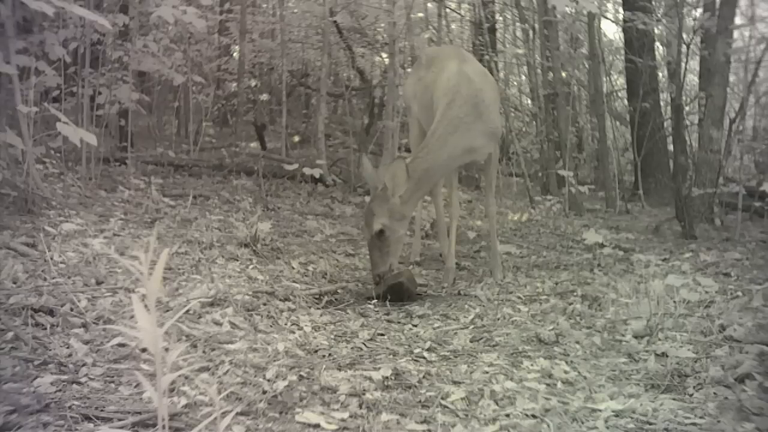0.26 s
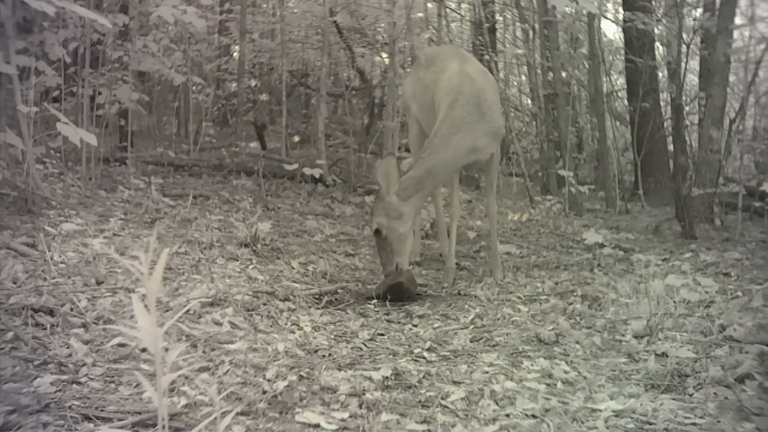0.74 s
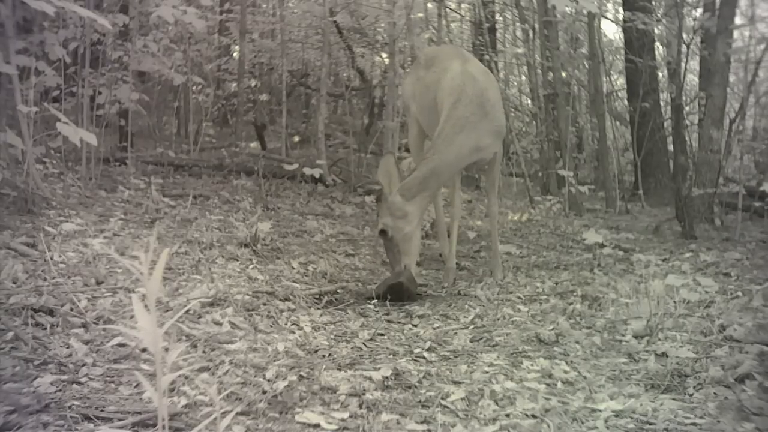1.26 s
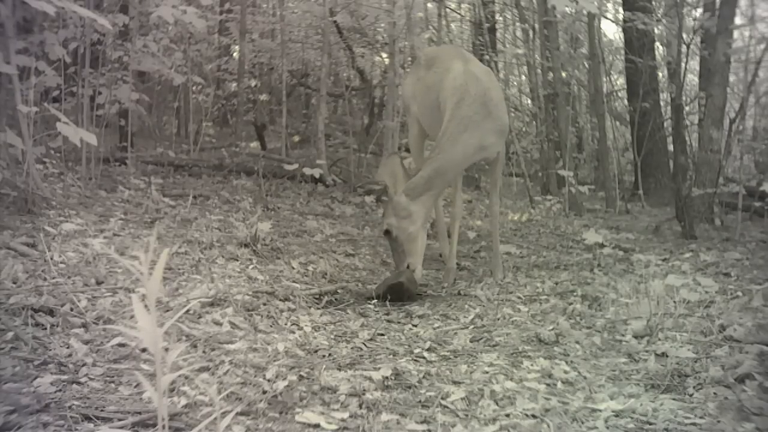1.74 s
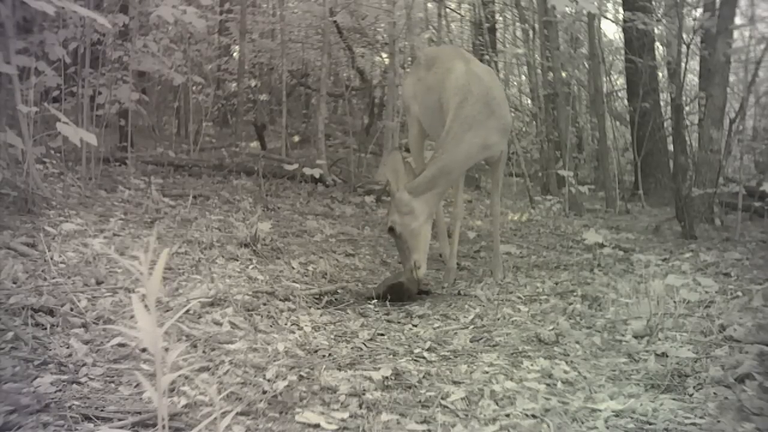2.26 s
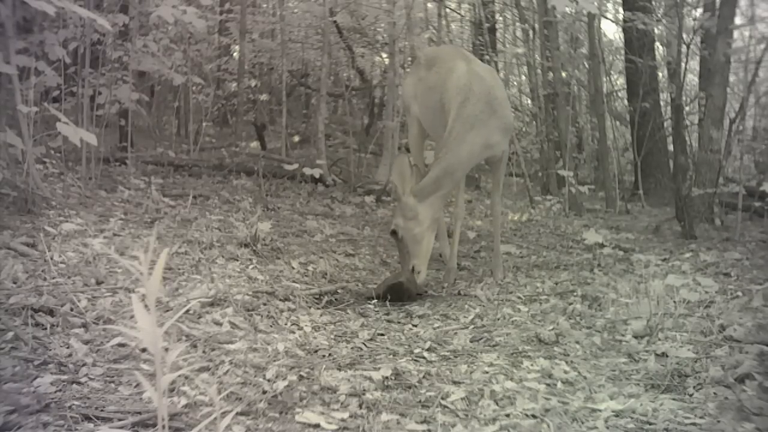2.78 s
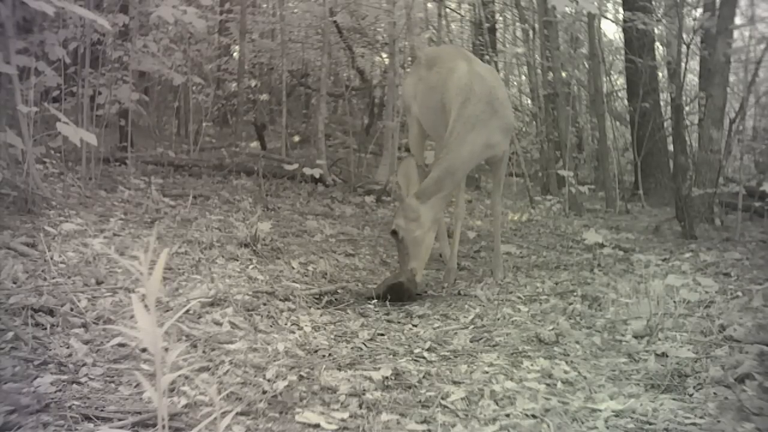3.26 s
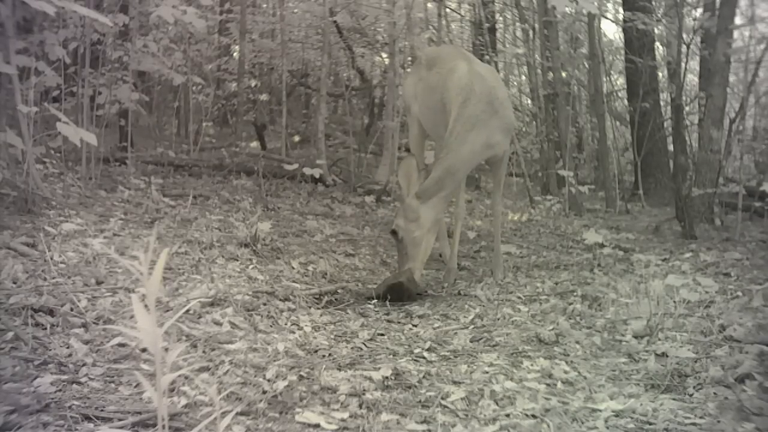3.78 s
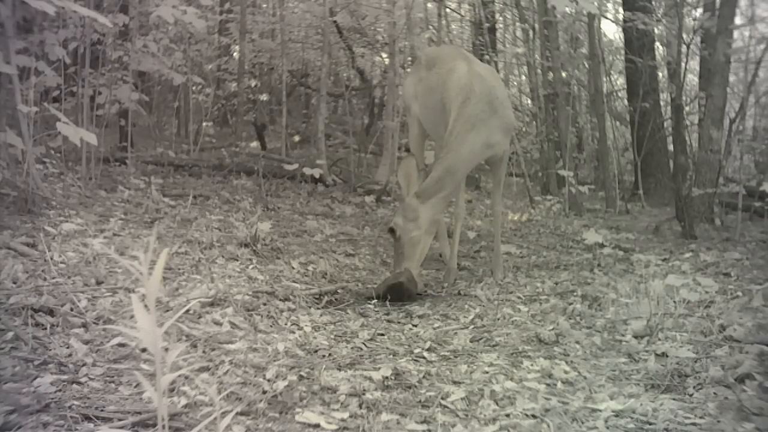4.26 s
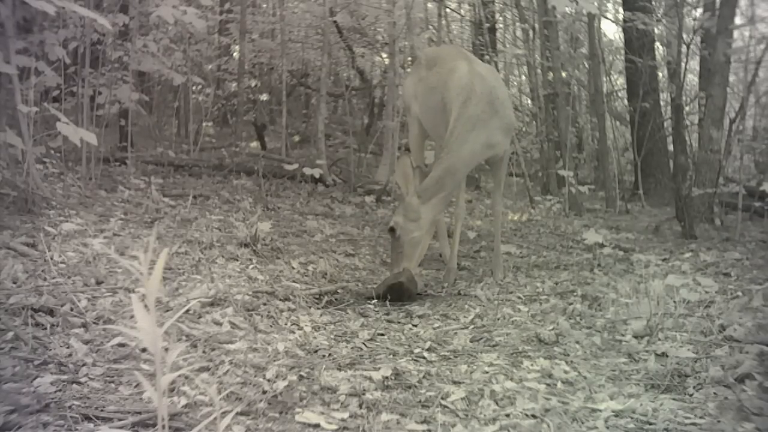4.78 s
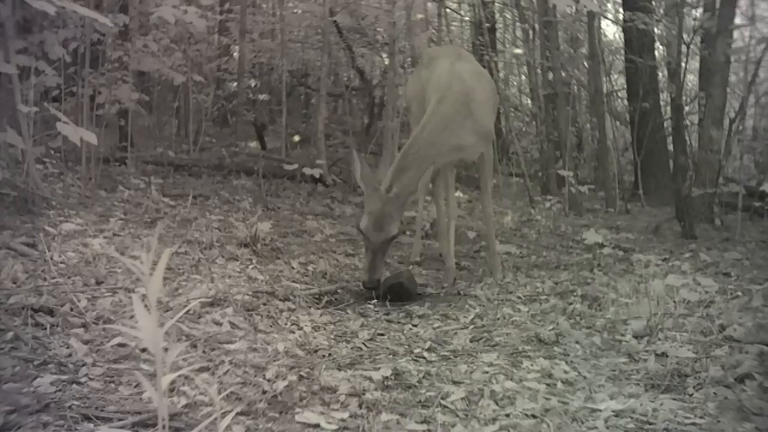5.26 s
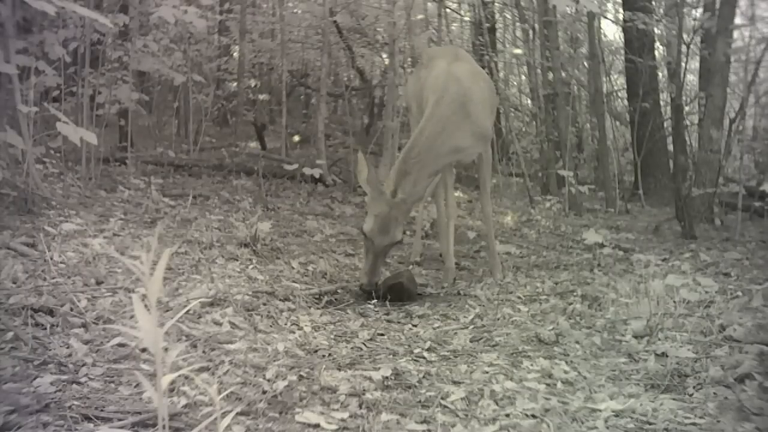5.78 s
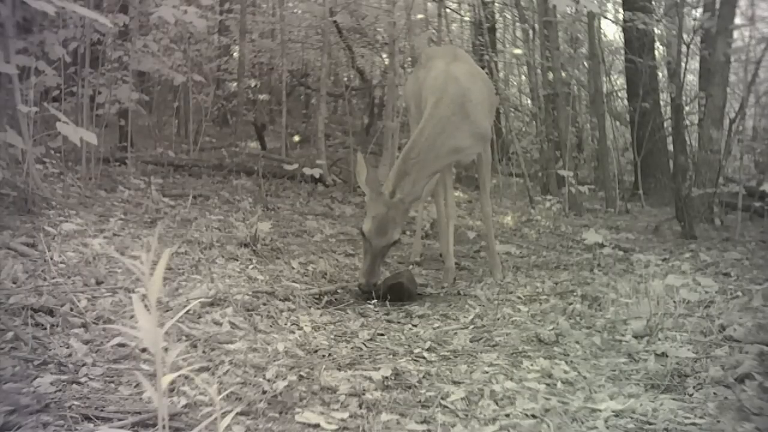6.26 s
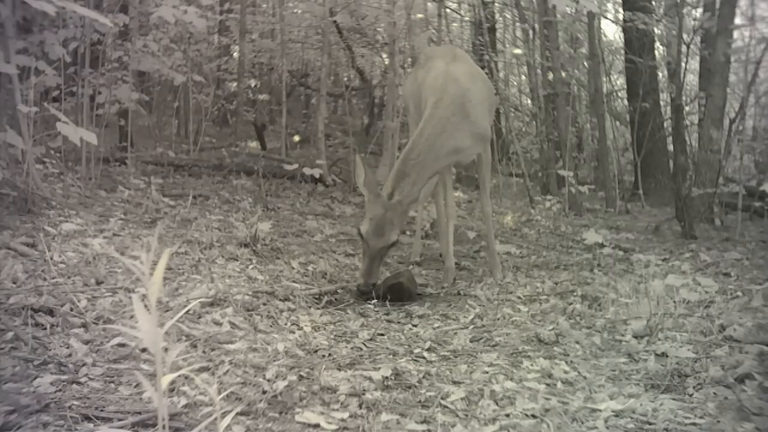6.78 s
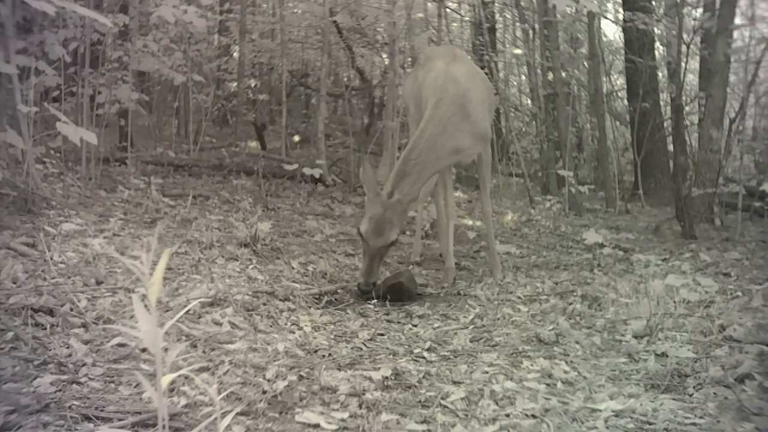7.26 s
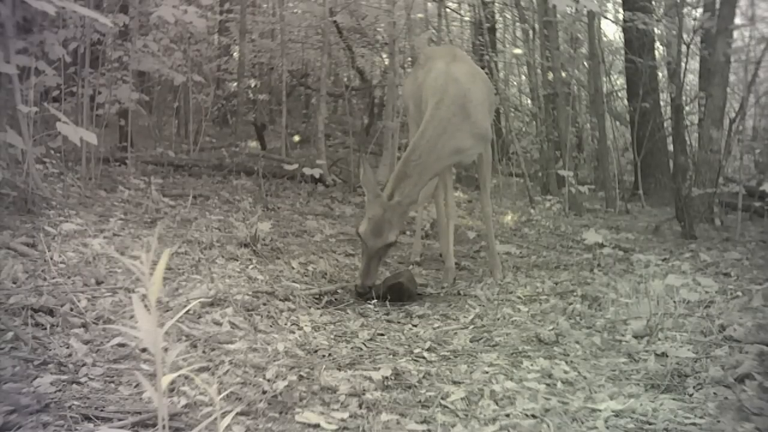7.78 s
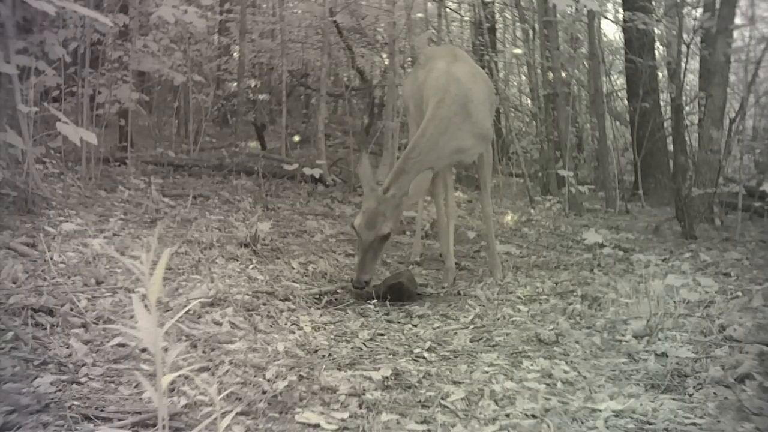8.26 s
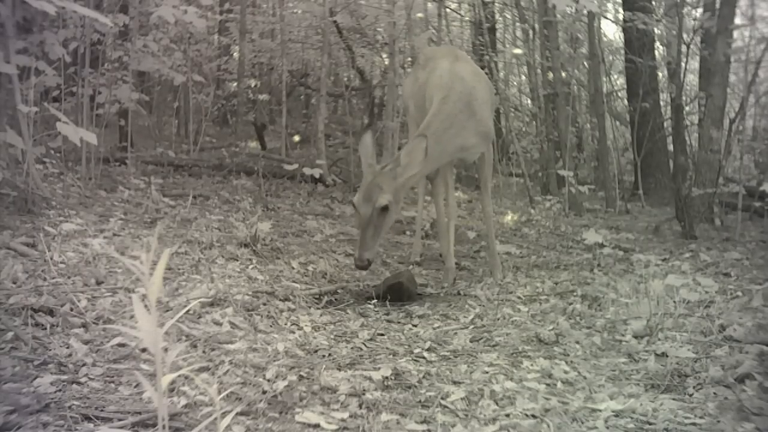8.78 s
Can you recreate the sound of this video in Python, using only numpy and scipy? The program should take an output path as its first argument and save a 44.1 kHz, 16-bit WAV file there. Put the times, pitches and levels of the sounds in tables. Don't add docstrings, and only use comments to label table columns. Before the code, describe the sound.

Hoarse, fluttering rising whistles repeat every couple of seconds among trees, with leaf ticks, faint insects, recorder hiss, a thump and a brief dropout.

```python
import sys
import numpy as np
from scipy import signal
from scipy.fft import rfft, irfft, next_fast_len
from scipy.io import wavfile

SR = 44100
rng = np.random.default_rng(int(sys.argv[2]) if len(sys.argv) > 2 else 0)


def boost(x):
    u = np.asarray(x, float) / 20
    return 10 ** u


def master(y):
    cut = np.clip(np.atleast_2d(y).T, -1, 1)
    pcm = np.round(cut * 32767)
    wavfile.write(sys.argv[1], SR, pcm.astype(np.int16))


N = 397782


def seconds():
    return np.arange(N) / SR


def rms_one(x):
    return x / np.sqrt(np.mean(x ** 2) + 1e-20)


def drift(rate_hz, size=N):
    r, run_in = np.exp(-2 * np.pi * rate_hz / SR), int(SR / rate_hz)
    noise = rng.standard_normal(size + run_in)
    return rms_one(signal.lfilter([1], [1, -2 * r, r * r], noise)[run_in:])


def resonate(x, hz, width_hz):
    r = np.exp(-np.pi * width_hz / SR)
    top_gain = (1 - r * r) / 2
    return signal.lfilter([top_gain, 0, -top_gain], [1, -2 * r * np.cos(2 * np.pi * hz / SR), r * r], x)


def coloured(spectrum):
    size = next_fast_len(N)
    points_hz, level_db = np.transpose(spectrum)
    log_hz = np.log(np.fft.rfftfreq(size, 1 / SR) + 1)
    colour = boost(np.interp(log_hz, np.log(points_hz), level_db))
    return rms_one(irfft(rfft(rng.standard_normal(size)) * colour, size)[:N])


# (start [s], depth [dB], recovery [s])
DUCKS = [
    (0.877, -8, 0.108),
    (2.75, -4, 0.049),
    (4.21, -8, 0.0643),
    (6.02, -9, 0.0425),
    (8.079, -12.5, 0.0703),
]


def gain_db():
    t = np.arange(0, N / SR + 1, 1e-3)
    dips = np.zeros(len(t))
    for s, depth_db, recovery_s in DUCKS:
        attack = np.clip((t - s) / 0.0155, 0, 1)
        dips += depth_db * attack * np.exp(-(np.maximum(t - s, 0) / recovery_s) ** 2)
    return np.interp(seconds(), t, dips)


# (frequency [Hz], level per Hz [dB])
HISS = [(24, -34), (40, -3.5), (46, -15.5), (54, -9), (108, -9), (357, -17.5), (405, -18), (3270, -30.5),
        (4300, -30), (4870, -34), (6090, -36.5), (8210, -34.5), (8850, -38.5), (13900, -43), (15300, -45)]


def background():
    hiss = boost(-37 + 0.455 * drift(4)) * coloured(HISS)
    housing_hz, housing_width_hz = 4900, 1085
    leaves = rng.standard_normal(N)
    for _ in range(2):
        leaves = resonate(leaves, housing_hz, housing_width_hz)
    stir_db = 2.0 * drift(3) + 1.1 * drift(25)
    return hiss + boost(-50 + stir_db) * rms_one(leaves)


# (multiple of frame rate [1], peak level [dB])
HUM = [(1, -33), (2, -48), (3, -52), (4, -50)]


def supply():
    t = seconds()
    frame_hz, hum_dip_s = 29.987, 0.01302
    hum = -sum(boost(level_db) * np.cos(2 * np.pi * k * frame_hz * (t - hum_dip_s)) for k, level_db in HUM)
    since = (t - np.where(t < 5, .1, .42)) % .5
    sag = -boost(-33) * np.sin(2 * np.pi * 9.0 * since) * np.exp(-since / 0.093)
    pause_start_s, pause_end_s = 4.92, 5.37
    running = np.clip(np.maximum(pause_start_s - t, t - pause_end_s) / 0.024, 0, 1)
    whine = boost(-70.5) * np.sin(2 * np.pi * 11960 * t)
    after = np.maximum(t - 3.9658, 0)
    leak = (33 * np.exp(-33 * after) - 1.5 * np.exp(-1.5 * after)) / 31.5
    thump = -boost(.2) * (1 - np.exp(-after / .0032)) * leak
    return running * (hum * boost(0.77 * gain_db()) + sag) + whine + thump


# (start [s], end [s], pitch [Hz], rms level [dB])
INSECTS = [(0, 2.55, 8460, -68), (3.31, 7.1, 8450, -66.5), (7.852, 9.1, 8450, -65.5), (0, .6, 8110, -69),
           (2.35, 2.8, 8130, -68), (3.28, 3.92, 8120, -68), (0, 2.75, 8320, -72), (3.1, 7.1, 8320, -72),
           (5.3, 9.1, 7900, -71), (0, .35, 7650, -70), (5.7, 7.2, 7450, -73)]


def insects():
    out = np.zeros(N)
    chirps_per_s, chirp_s = 25.0, .0042
    for start, end, hz, level_db in INSECTS:
        song = slice(int(start * SR), int(end * SR))
        t = seconds()[song]
        on = np.clip(np.minimum(t - start, end - t) / .04, 0, 1)
        beat = ((t - start) * chirps_per_s + .5) % 1 - .5
        chirps = .15 + np.exp(-.5 * (beat / chirps_per_s / chirp_s) ** 2)
        tone = np.sin(2 * np.pi * hz * t + 1.5 * drift(9, size=len(t)))
        out[song] += boost(level_db + 4.5) * on * rms_one(chirps * tone)
    return out


# (time [s], peak level [dB], pitch [Hz])
TICKS = [
    (1.4885, -27, 4790),
    (1.8841, -27.5, 4900),
    (2.4238, -21, 4990),
    (3.9922, -20, 4785),
    (4.5394, -33, 4600),
    (4.9003, -40, 4880),
    (7.1094, -31, 4920),
    (8.0037, -28, 4920),
]
# (start [s], level [dB], length [s], lowest [Hz], highest [Hz])
RUSTLES = [
    (2.575, -36.5, 0.114, 4150, 5140),
    (2.565, -39, 0.071, 3550, 3950),
    (7.865, -45, 0.028, 3500, 4060),
    (4.445, -40.5, 0.044, 3680, 5940),
    (7.995, -42, 0.029, 4200, 5250),
    (7.98, -34.5, 0.0277, 2484, 2700),
    (4.893, -48.5, .014, 4410, 4970),
    (5.2, -51, 0.058, 8200, 8500),
]


def litter():
    out, t = np.zeros(N), np.arange(SR // 10) / SR
    tick_t60_s = .0072
    for s, peak_db, hz in TICKS:
        ring = np.sin(2 * np.pi * hz * t) + 0.37 * np.sin(2 * np.pi * 1.121 * hz * t)
        decay = boost(peak_db + 5.0 - 60 * t / tick_t60_s)
        out[int(s * SR):][:len(t)] += decay * ring * np.clip(t / 0.00056, 0, 1)
    for s, level_db, length_s, low_hz, high_hz in RUSTLES:
        t = np.arange(int(4 * length_s * SR)) / SR
        band = signal.butter(2, [low_hz, high_hz], "band", fs=SR, output="sos")
        swell = np.clip(t / 0.011, 0, 1) * np.exp(-(t / length_s) ** 2)
        noise = rms_one(signal.sosfilt(band, rng.standard_normal(len(t))))
        out[int(s * SR):][:len(t)] += boost(level_db) * swell * noise
    return out


# (decay by 60 dB [s], level [dB])
ECHOES = [
    (.2, -2),
    (.55, -7.5),
]


def trunks(x):
    t = np.arange(SR) / SR
    dying = sum(boost(2 * (db - 60 * t / t60)) / t60 for t60, db in ECHOES)
    power = dying * 6 * np.log(10) / SR
    cloud = rng.standard_normal(SR) * np.sqrt(power) * np.clip(t / 0.0035, 0, 1)
    return signal.fftconvolve(x, cloud)[:N]


def raspy(turn, width_hz, rasp):
    rasp, size = np.clip(rasp, 0, 1), len(turn)
    slow, fast = ((drift(hz, size=size) + 1j * drift(hz, size=size)) / np.sqrt(2)
                  for hz in (width_hz, 2.1 * width_hz))
    fast_share = .35 * rasp ** 3
    wander = np.sqrt(1 - fast_share) * slow + np.sqrt(fast_share) * fast
    return np.real((np.sqrt(1 - rasp) + np.sqrt(rasp) * wander) * np.exp(1j * turn))


# (start [s], lowest [Hz], top [Hz], slide [s], bend [1 straight, 2 rounded])
SLIDES = [
    (.77, 2362, 4341, 0.1925, 2.03),
    (2.6, 2892, 4625, .14, 1.3),
    (4.05, 2388, 4515, .21, 2.6),
    (5.83, 1848, 4562, .2, 1.4),
    (7.95, 2048, 4390, .27, 3.2),
]
# (peak level [dB], swell [s], hold [s], fade [s], fade level [dB])
EFFORTS = [(-23, 0.0807, 0.1456, 0.101, -15.5), (-27.5, 0.071, 0.1104, 0.0815, -16),
           (-24.5, 0.078, 0.1109, .085, -12.5), (-22.5, 0.1022, 0.1755, 0.0903, -14),
           (-22, 0.0877, 0.118, 0.119, -9)]
# (upper in slide [dB], upper on top [dB], lower in slide [dB], lower on top [dB])
BURRS = [(-5.5, -5, -15, -16.5), (-9, -5, -1.5, -12), (-10, 0.5, -8.5, -21.5), (-4.5, -15, -16, -10.5),
         (-7.5, -14, -15.5, -16)]
# (flutter [Hz], line width [Hz], rasp share [0-1], second upper line [dB], echo [dB])
VOICES = [(390.9, 72, 0.83, -17, 1.5), (300, 110, 0.71, -15, 5), (499.2, 70, 0.85, -33, 3.5),
          (371.5, 100, 0.74, -27, -0.5), (370, 60, 0.55, -26, 0)]


def calls():
    out = np.zeros((2, N))
    for slide, effort, burr, voice in zip(SLIDES, EFFORTS, BURRS, VOICES):
        s, low_hz, top_hz, slide_s, bend = slide
        peak_db, swell_s, hold_s, fade_s, fade_db = effort
        upper_slide_db, upper_top_db, lower_slide_db, lower_top_db = burr
        flutter_hz, width_hz, rasp, second_db, echo_db = voice
        start, t = int(s * SR), np.arange(0, swell_s + hold_s + fade_s, 1 / SR)

        rise = (top_hz - low_hz) * np.clip(1 - t / slide_s, 0, 1) ** bend
        sag = 611 * np.maximum(t - swell_s - hold_s, 0)
        hz = top_hz - rise - sag
        level_db = peak_db + np.interp(t, np.cumsum([0, swell_s, hold_s, fade_s]), [-25, 0, 0, fade_db])

        settled = np.interp(t, (0.094, 0.213), [0, 1])
        upper_db = upper_slide_db + (upper_top_db - upper_slide_db) * settled
        lower_db = lower_slide_db + (lower_top_db - lower_slide_db) * settled

        turn = 2 * np.pi * np.cumsum(hz) / SR
        flutter = 2 * np.pi * np.cumsum(flutter_hz * (1 + 0.06 * drift(29.8, size=len(t)))) / SR
        hoarse = rasp + (1 - rasp) * (hz.max() - hz) / 1300
        line_levels_db = [lower_db, 0, upper_db, upper_db + second_db]
        lines = sum(boost(db) * raspy(turn + k * flutter, width_hz, hoarse)
                    for k, db in enumerate(line_levels_db, start=-1))
        edges = np.clip(np.minimum((t - t[0]) / 0.0116, (t[-1] - t) / 0.0046), 0, 1)
        call = boost(level_db - 1.5) * edges * lines
        out[:, start:start + len(t)] = call * boost(np.array([[0], [echo_db]]))
    return out


# (time [s], level [dB])
FADE = [
    (0, 0),
    (4.3, 0),
    (4.45, -3),
    (4.6, -6),
    (4.75, -13.5),
    (4.92, -12.5),
    (5.19, 0.5),
    (9.1, 0),
]


def scene():
    fade_db = np.interp(seconds(), *np.transpose(FADE))
    direct, scattered = calls()
    near = litter()
    echoes = trunks(scattered + boost(-0.5) * near)
    far = echoes + boost(gain_db()) * (background() + insects())
    mono = direct + near + boost(fade_db) * far + supply()
    return np.stack([mono, mono])


def roll_off(x):
    return signal.sosfilt(signal.butter(12, 16350, fs=SR, output="sos"), x)


# (frequency [Hz], level per Hz [dB])
SIDE_NOISE = [(24, -43.5), (40, 8), (73, -0.5), (217, -21), (943, -19), (5250, -20.5), (15300, -25)]
OFFSET = [
    [.007],
    [-.011],
]
# (start [s], end [s])
DROPOUT_S = (4.9146, 5.2016)


def record(dry):
    t = seconds()
    live = (t < DROPOUT_S[0]) | (t > DROPOUT_S[1])
    noisy = dry + boost(-66.5) * coloured(SIDE_NOISE) * [[1], [-1]] + OFFSET
    top_cut = signal.ellip(10, .3, 70, 15330, fs=SR, output="sos")
    mix = signal.sosfilt(top_cut, noisy * live + 1e-18)
    return roll_off(mix)


dry = scene()
out = record(dry)
master(out)
```